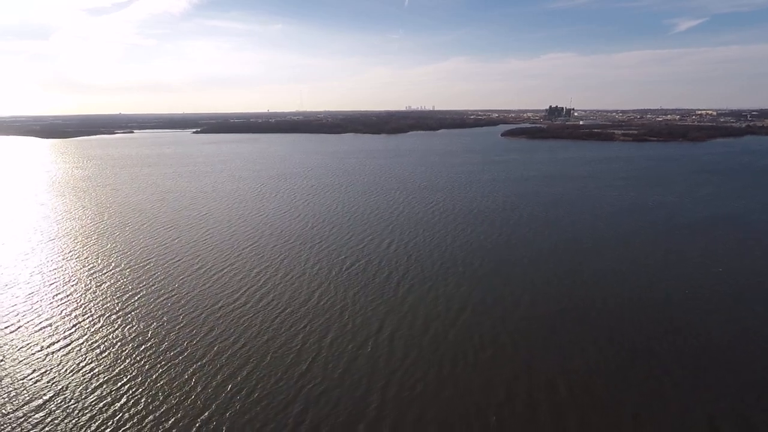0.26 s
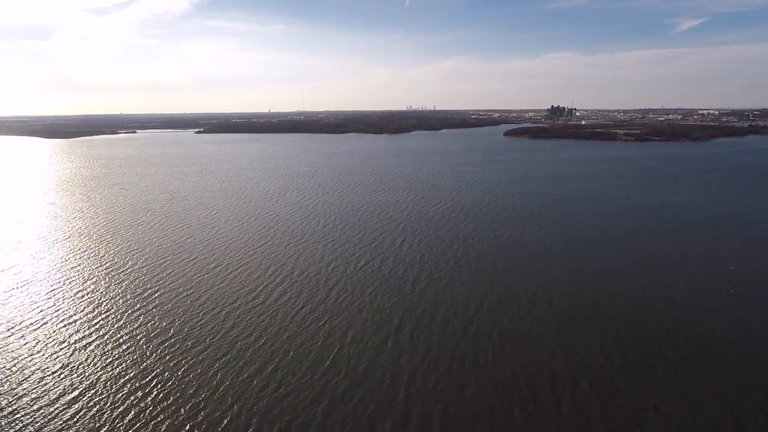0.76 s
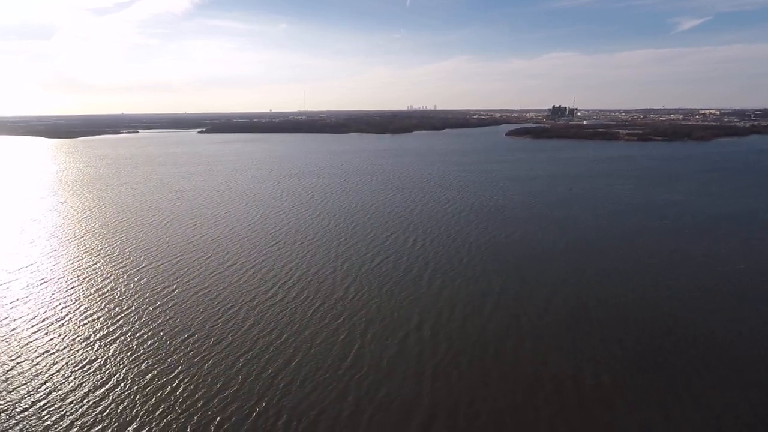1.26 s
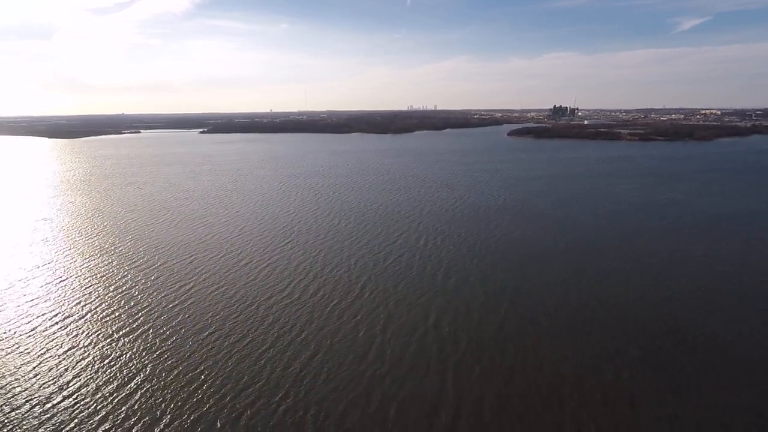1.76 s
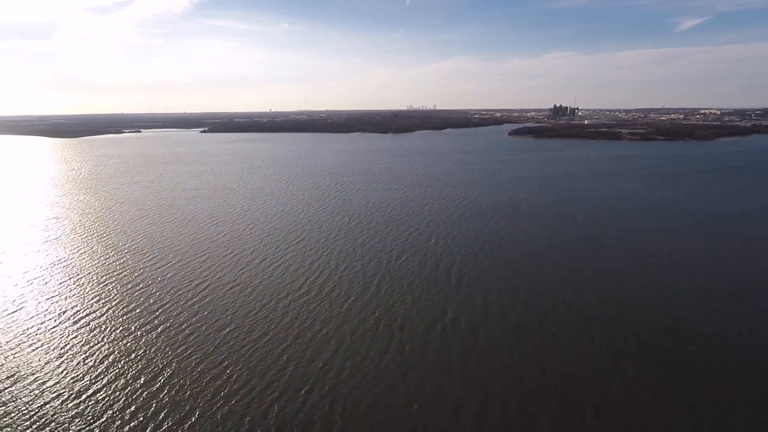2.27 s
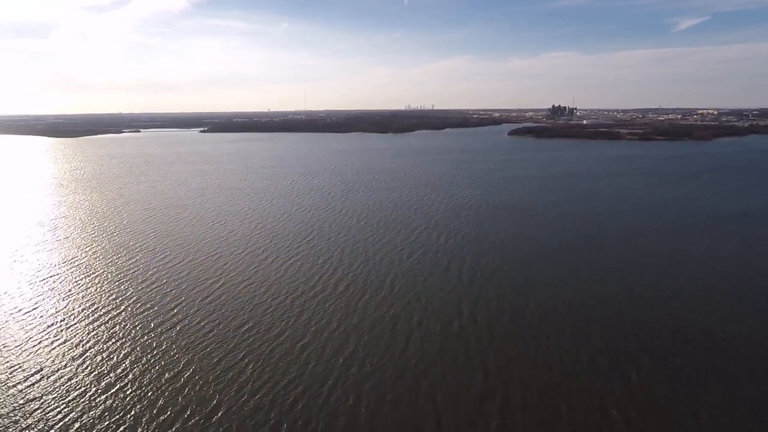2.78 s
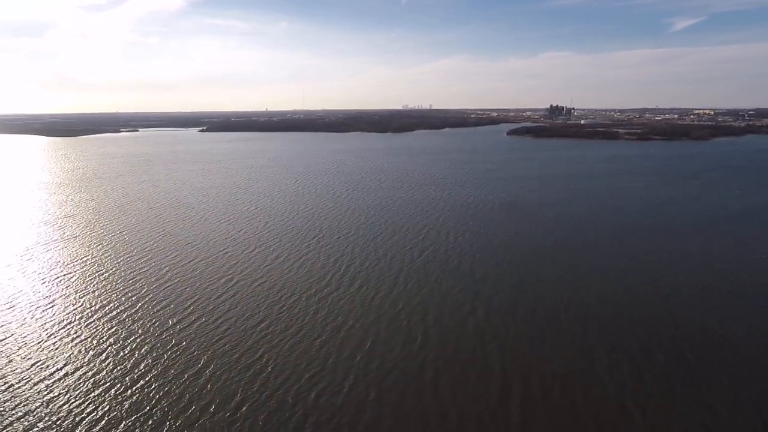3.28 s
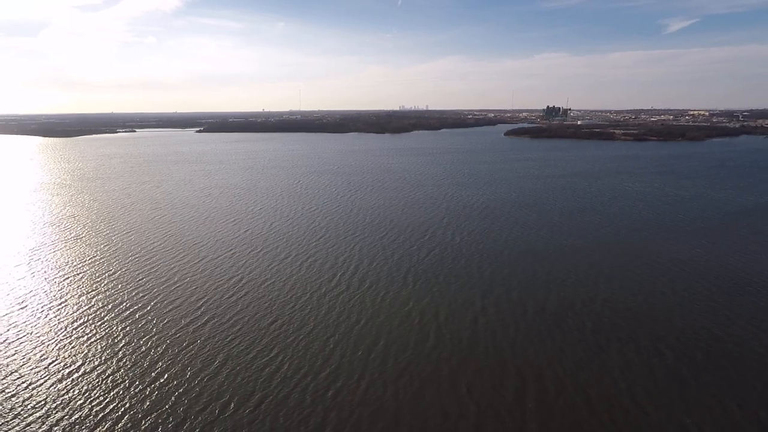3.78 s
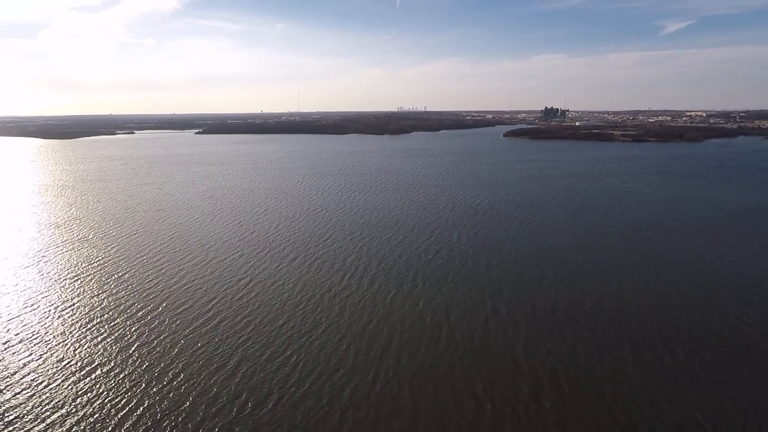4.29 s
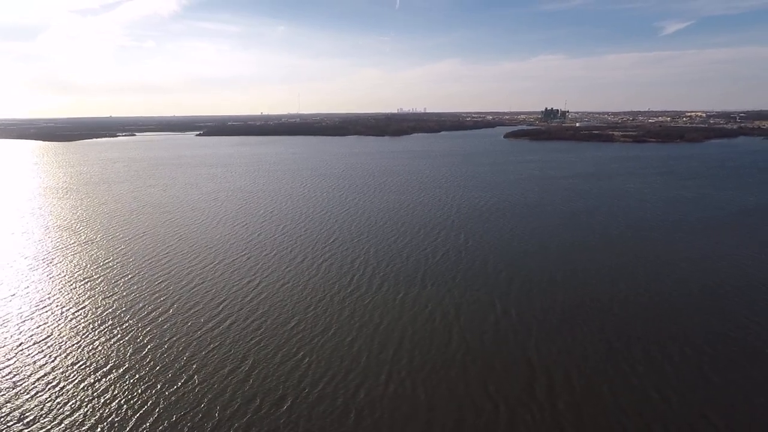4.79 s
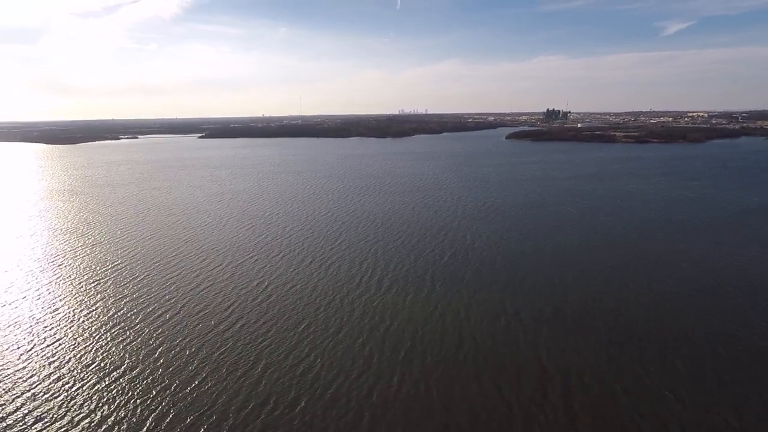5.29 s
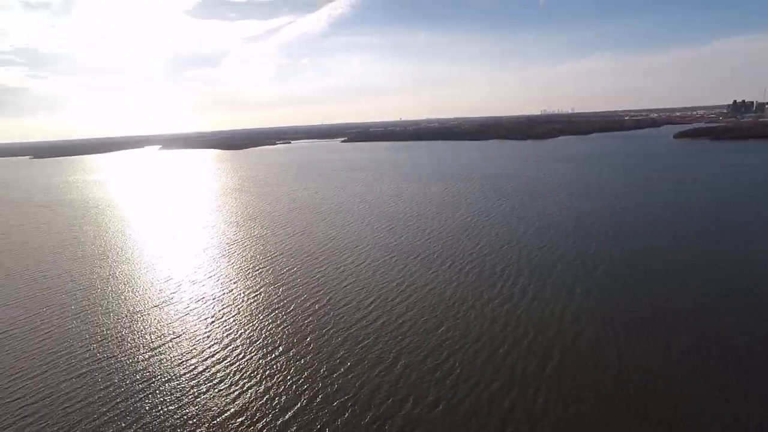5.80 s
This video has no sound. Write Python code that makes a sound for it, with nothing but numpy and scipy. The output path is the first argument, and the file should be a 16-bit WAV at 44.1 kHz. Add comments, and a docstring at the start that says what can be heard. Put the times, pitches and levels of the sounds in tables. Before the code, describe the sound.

Close rotor hum and fluttering prop wash pound the microphone, drop to a cleaner whine, then return with rushing wind and hard slaps of air.

```python
"""Over open water, in the air: a small quadcopter, heard at the camera that hangs under it, close to its rotors.
The nearest propeller's wake slaps the microphone once a blade, as pulsing dips of pressure and puffs of noise.
The other rotors hum as harmonics of their blade rates; sine tones tied to the rotor speeds make the motor whine.
That rotor slows and the buffeting drops away; then the craft gathers speed with a rush of filtered noise,
and gusts and torn eddies rumble, slap and crack at the microphone."""
import sys
import numpy as np
from scipy import signal
from scipy.fft import rfft, irfft
from scipy.io import wavfile
from scipy.ndimage import uniform_filter1d

SR = 44100
rng = np.random.default_rng(int(sys.argv[2]) if len(sys.argv) > 2 else 0)


def unload_audio(sound):
    """Save the sound as a 16-bit wav file, at the path given as the first command line argument."""
    columns = np.transpose(np.atleast_2d(sound))
    # keep every value between -1 and 1, then stretch to whole-number steps
    steps = np.round(np.clip(columns, -1, 1) * 32767)
    wavfile.write(sys.argv[1], SR, steps.astype(np.int16))


N = 266800
TIME = np.arange(N) / SR  # s

# blade rate of the nearest rotor: [t/s, f/Hz]
NEAR_ROTOR = [(0, 182), (.08, 182), (.14, 175), (.4, 187), (.52, 180), (.7, 183), (.8, 179), (1.08, 179),
              (1.16, 173), (1.29, 175), (1.4, 186), (1.65, 189), (1.76, 182), (1.91, 188), (2.04, 178),
              (2.2, 184), (2.43, 181), (2.56, 177), (2.8, 185), (2.9, 181), (3.14, 196), (3.23, 172),
              (3.34, 161), (3.5, 150), (3.62, 159), (3.71, 150), (3.79, 155), (3.86, 152), (4.01, 173),
              (4.07, 169), (4.28, 170.5), (4.37, 177.5), (4.55, 171), (4.72, 177), (4.89, 171), (5.1, 175),
              (5.25, 169), (5.43, 183), (5.52, 180), (5.62, 188), (5.88, 181), (6.05, 183)]
# blade rate of the second rotor, which surges again and again to hold the tilt: [t/s, f/Hz]
SECOND_ROTOR = [(0, 185), (1.2, 182), (1.6, 187), (2.6, 183), (3.32, 189), (3.39, 185), (3.45, 187.5),
                (3.52, 175), (3.58, 170), (3.64, 188), (3.7, 185), (3.76, 169), (3.81, 167.5), (3.87, 187),
                (3.95, 178), (4, 192), (4.12, 189), (4.24, 192), (4.55, 181), (4.66, 187), (4.75, 180),
                (4.83, 186), (4.93, 180.5), (5.17, 185), (5.24, 178.5), (5.33, 187), (5.5, 179.5),
                (5.59, 187), (5.7, 183), (5.95, 161), (6.05, 174)]
# air rushing past the frame, against hovering: [t/s, level/dB]
AIRSPEED = [(0, -0.5), (2.9, -1), (3.3, 1.5), (3.72, 8.5), (4.14, 10), (4.55, 4.5), (5.1, 10.5), (5.27, 9),
            (5.38, 11), (5.6, 7), (5.7, -1), (6.05, 6.5)]
# how strongly the wake blows on the microphone, against hovering: [t/s, level/dB]
WAKE = [(0, -.3), (.8, 1), (1.18, -0.3), (1.45, -1.5), (2.3, 0.8), (2.7, -1.5), (3.16, 1.5), (3.22, -8),
        (3.37, -25.5), (3.94, -18.5), (3.98, -7.5), (4.35, -4.5), (4.62, -2), (4.88, -3), (5.39, -1),
        (5.51, -1), (5.77, 1.3), (5.87, -12), (6.05, -11)]
# gusts on the microphone: [start t/s, end t/s, rumble level/dB]
GUSTS = [(3.955, 4.17, -16), (4.28, 4.5, -13), (5.2, 5.6, -18)]
# spells with the core of the wake on the microphone: [start t/s, end t/s, throb level/dB]
THROBS = [(-.1, 3.22, -19), (4.53, 4.76, -15.5), (5.03, 5.52, -16), (5.6, 5.73, -19)]
# hardest slaps of air, before build-up time and trim: [t/s, level/dB]
SLAPS = [(0.207, -4), (.253, -3), (.861, -9), (3.155, -2), (3.184, -5.5), (3.261, -3.5), (3.99, -3.5),
         (4.004, -9), (4.018, -9), (4.028, -5.5), (4.095, -19), (4.116, 0), (4.146, 2), (4.159, -4),
         (4.189, -9), (4.212, -7), (4.224, -2), (4.236, -6), (4.247, -2), (4.276, -8), (4.307, 1),
         (4.311, -6), (4.319, -2), (4.333, -4), (4.353, -0.5), (4.377, 0), (4.388, 6), (4.421, -2),
         (4.486, -6), (4.5, -2), (4.555, -4), (4.572, -2), (4.609, -3), (4.64, -2), (4.665, -5),
         (4.708, -7), (4.859, -3), (5.357, -2), (5.656, -2), (5.694, -3), (5.981, -10)]
# sharp cracks of air, peak before trim: [t/s, level/dB]
CRACKS = [(.2099, -18), (.303, -13), (0.3443, -15), (.5422, -16), (0.696, -11), (.779, -11), (0.8124, -12),
          (.796, -17), (.833, -15), (.8525, -19), (.941, -16.5), (1.0085, -22), (1.0645, -23),
          (1.1505, -11), (1.1717, -14), (1.1846, -16), (1.3533, -17), (1.4117, -18), (1.9898, -16),
          (2.0884, -13.5), (2.3215, -18), (2.338, -19), (2.5027, -13), (2.802, -14), (2.9629, -16),
          (3.0378, -12), (3.071, -14), (3.1125, -18), (3.118, -16), (3.1244, -10), (3.1405, -8.5),
          (3.147, -18), (3.167, -19), (3.1844, -15), (4.1175, -10), (4.277, -14), (4.3075, -12),
          (4.338, -13), (4.388, -11.5), (4.446, -15), (4.457, -6), (4.462, -7), (4.508, -10),
          (4.5617, -11.5), (4.587, -6), (5.2374, -11), (5.3908, -13), (5.6286, -12), (5.6727, -14)]
# tone of one propeller: [multiple of the blade rate, relative level/dB]
BLADE_ORDERS = [(1, 3.5), (2, -6), (3, -13), (4, -14), (5, -10.5), (6, -19), (7, -20.5), (9, -24),
                (11, -28)]

# spectra of the steady draft, the wind rumble and the rush of air: [f/Hz, relative level/dB]
DRAFT_SPECTRUM = [(15, -33), (30, 2), (55, 2.5), (120, -1.5), (220, -9.5), (800, -53.5)]
RUMBLE_SPECTRUM = [(15, -17), (30, -23.5), (50, -5), (85, 1), (140, 0), (200, -7), (300, -26), (600, -34),
                   (2000, -74)]
RUSH_SPECTRUM = [(400, 18), (1500, 21.5), (2500, 16), (3700, 12), (5000, 10.5), (7000, 2.5), (9700, 1),
                 (11200, -4), (12700, -2), (15500, -7)]
# spectrum of the blade swish: [f/Hz, relative level/dB]
SWISH_SPECTRUM = [(150, 2.5), (400, -1.5), (1100, 2), (2000, -7.5), (3000, -16), (3900, -13.5), (5200, -26),
                  (7000, -28.5), (9500, -30), (11500, -52), (16000, -56)]
# spectra of a slap and of a crack: [f/Hz, relative level/dB]
SLAP_SPECTRUM = [(30, 8), (75, 15), (130, 4.5), (260, 10), (650, 7.5), (1300, -2.5), (2200, -13),
                 (3500, -25), (8000, -35), (16000, -73)]
CRACK_SPECTRUM = [(500, 2.5), (2000, 14), (4000, 7.5), (6300, 0), (8000, -8), (10500, -15), (15500, -26)]
# spectra of the wake's thud, buffet, crackle, spikes and chopped airstream: [f/Hz, relative level/dB]
THUD_SPECTRUM = [(60, -31), (150, -1), (250, -0.5), (400, -6.5), (700, -13), (1500, -39), (5000, -79)]
BUFFET_SPECTRUM = [(60, -29), (250, -3), (500, -3.5), (750, -6.5), (1200, -9.5), (2000, -16), (3200, -31.5),
                   (5000, -55), (8000, -80), (16000, -64)]
CRACKLE_SPECTRUM = [(500, -12), (1500, 5.5), (3000, 4.5), (5000, -5), (7000, -21), (9500, -26),
                    (12000, -40), (16000, -32)]
SPIKE_SPECTRUM = [(300, -18), (1200, 0.5), (2500, 4.5), (4500, -6.5), (7000, -19.5), (10000, -30.5),
                  (16000, -31)]
CHOP_SPECTRUM = [(500, -1), (1500, 2.5), (3000, 3), (5000, -5), (7000, -19), (10000, -27), (16000, -31)]

# dB that each layer gains for one dB of wake
THUD_PER_WAKE, BUFFET_PER_WAKE, CRACKLE_PER_WAKE, RUMBLE_PER_WAKE = 0.79, 0.84, 1.7, 0.31
SPIKES_PER_WAKE, CHOP_PER_WAKE = 1.8, 1.07
CRACK_TILT_PER_WAKE = 0.73  # dB per octave for one dB of wake
# dB that each layer gains for one dB of airspeed
BUFFET_PER_AIR, CRACKLE_PER_AIR, RUMBLE_PER_AIR, WHINE_PER_AIR = -0.47, 0.27, -0.14, 0.79

WHINE_PER_BLADE = 21  # cycles of motor whine in one blade pass
OVERTONE = 4 / 3  # upper partial of a motor, as a multiple of its whine
# resonance of the frame that carries the whine
FRAME_HZ, FRAME_HALF_WIDTH_HZ = 3770, 190
# a motor whines louder while it is driven faster and fades while it coasts
DRIVE_DB, FULL_DRIVE_HZ_PER_S = 4, 120

# once the craft tilts, the wake bunches less tightly behind each blade and its puffs grow uneven
TILT_S, TILT_LENGTH_S = 3.2, 0.12
HOVER_BUNCHING, TILTED_BUNCHING = 1.22, 0.62
HOVER_SCATTER_DB, TILTED_SCATTER_DB = 1, 5
# as the tilt begins, the core swings toward the microphone and its throb runs ahead of the blades
SWING_S, SWING_LENGTH_S, SWING_TURNS = 3.13, 0.04, 1
DIP_NARROWNESS = 0.61  # second harmonic of the dip against the first, per unit of bunching
CRACKLE_FOCUS = 0.9  # how closely the crackle keeps to the peak of each puff
SPIKE_RATE_PER_S = 260  # weighted by the squared puff envelope
THROB_EDGE_S, GUST_EDGE_S = 0.037, 0.0091
EDGE_HZ = 15500  # upper band limit


def gain_of(db):
    """Amplitude factor for a level in dB."""
    return 10 ** (np.asarray(db) / 20)


def evened(x):
    """The signal scaled to rms 1."""
    return x / np.sqrt(np.mean(x ** 2) + 1e-20)


def follow(rows):
    """Value of a two-column curve table, sample by sample."""
    s, values = np.transpose(rows)
    return np.interp(TIME, s, values)


def spells(rows, edge_s):
    """Gain that swells at the start of each row, holds its level and dies at its end."""
    total = np.zeros(N)
    for start, end, db in rows:
        swell = np.tanh((TIME - start) / edge_s)
        fade = np.tanh((TIME - end) / edge_s)
        total += gain_of(db) * (swell - fade) / 2
    return total


def wander(hz):
    """Chance drift of rms 1, mostly slower than hz."""
    low_pass = 1 / (1 + (np.fft.rfftfreq(N, 1 / SR) / hz) ** 4)
    return evened(irfft(rfft(rng.standard_normal(N)) * low_pass, N))


def colour(x, points, size=8192):
    """Causal, minimum-phase filter with the given spectrum."""
    hz, db = np.transpose(points)
    bins_hz = abs(np.fft.fftfreq(size, 1 / SR)) + 1
    log_gain = np.log(gain_of(np.interp(np.log(bins_hz), np.log(hz), db)))
    response = np.exp(np.conj(signal.hilbert(log_gain)))
    taps = np.fft.ifft(response).real[:size // 2]
    return signal.oaconvolve(x, taps)[:len(x)]


def hiss(points, envelope=1):
    """Noise shaped by an envelope, then given a colour, rms 1."""
    return evened(colour(rng.standard_normal(N) * envelope, points))


def wind(air_db, wake_db):
    """A steady low draft, a rumble stirred by the wake and by gusts, and a rush that grows with airspeed."""
    draft = gain_of(-27.5) * hiss(DRAFT_SPECTRUM)
    stirred = gain_of(-16.5 + RUMBLE_PER_WAKE * wake_db + RUMBLE_PER_AIR * air_db)
    gusts = spells(GUSTS, GUST_EDGE_S)
    rumble = np.hypot(stirred, gusts) * hiss(RUMBLE_SPECTRUM)
    rush = gain_of(-42 + air_db) * hiss(RUSH_SPECTRUM, gain_of(1.6 * wander(120)))
    return draft + rumble + rush


def spin(rate_hz, flutter):
    """Count of blade passes; the flight controller keeps trimming the speed."""
    return np.cumsum(rate_hz * (1 + flutter * wander(11))) / SR


def propeller(turns, unsteady):
    """One pressure pulse a blade; each harmonic flutters in the uneven inflow."""
    tone = np.zeros(N)
    for order, db in BLADE_ORDERS:
        flutter = 1 + unsteady * wander(21)
        tone -= gain_of(db) * flutter * np.cos(2 * np.pi * order * turns)
    return tone


def motor(turns, ripple, overtone_db):
    """Magnets passing stator teeth whine above the blade rate, louder under drive and at the frame resonance."""
    angle = 2 * np.pi * WHINE_PER_BLADE * turns + ripple * wander(55)  # torque ripple blurs the line
    rate_hz = np.gradient(turns) * SR
    frame = 1 / np.hypot(1, (WHINE_PER_BLADE * rate_hz - FRAME_HZ) / FRAME_HALF_WIDTH_HZ)
    speeding = uniform_filter1d(np.gradient(rate_hz) * SR, size=1500)
    drive = gain_of(DRIVE_DB * np.clip(speeding / FULL_DRIVE_HZ_PER_S, -2, 0.25))
    partials = np.sin(angle) + gain_of(overtone_db) * np.sin(OVERTONE * angle)
    return frame * drive * (1 + 0.35 * wander(18)) * partials


def rotors(near_turns, near_hz, air_db):
    """Four rotors at slightly different speeds hum, three motors whine, and blades swish as pulsing noise."""
    second_hz = follow(SECOND_ROTOR)
    second = spin(second_hz, flutter=0.00098)
    # the far pair keeps near the mean speed
    mean_hz = (near_hz + second_hz) / 2
    third = spin(mean_hz, flutter=0.018)
    fourth = spin(mean_hz, flutter=0.018)

    tones = gain_of(-27) * propeller(near_turns, unsteady=0.15)
    tones += gain_of(-40) * propeller(second, unsteady=0.69)
    tones += gain_of(-43) * propeller(third, unsteady=0.75)
    tones += gain_of(-43) * propeller(fourth, unsteady=0.74)

    whine = gain_of(-48.5) * motor(second, ripple=0.55, overtone_db=-9)
    whine += gain_of(-50.5) * motor(near_turns, ripple=0.65, overtone_db=-8)
    whine += gain_of(-59) * motor(third, ripple=0.88, overtone_db=-14)

    near_swing = 0.22 * np.cos(2 * np.pi * near_turns)
    second_swing = 0.17 * np.cos(2 * np.pi * second)
    swish = gain_of(-32) * hiss(SWISH_SPECTRUM, 1 + near_swing + second_swing)
    return tones + gain_of(WHINE_PER_AIR * air_db) * whine + swish


def cracks(wake_db, rise_s, trim_db, size=2048):
    """Small eddies burst right on the microphone port, brighter in a stronger wake."""
    out = np.zeros(N + size)
    age = np.arange(size) / SR / rise_s
    corner_hz = CRACK_SPECTRUM[0][0]
    for s, db in CRACKS:
        at = round(s * SR)
        tilt = CRACK_TILT_PER_WAKE * wake_db[at]
        tone = [(hz, level + tilt * np.log2(hz / corner_hz)) for hz, level in CRACK_SPECTRUM]
        burst = colour(rng.standard_normal(size) * age * np.exp(-age), tone)
        out[at:][:size] += gain_of(db + trim_db) * burst / abs(burst).max()
    return out[:N]


def slaps(trim_db, build_s, tear_db, tear_s, rebound_hz):
    """A big eddy hits the microphone: a jolt of suction, a rebound of pressure, and a rasp as the eddy tears."""
    hits = np.zeros(N)
    for s, db in SLAPS:
        hits[round((s + build_s) * SR)] = gain_of(db + trim_db)
    decay = signal.lfilter([1], [1, -np.exp(-1 / (tear_s * SR))], hits)
    tear = gain_of(tear_db) * rng.standard_normal(N) * decay
    unit_peak = abs(colour(signal.unit_impulse(SR), SLAP_SPECTRUM)).max()
    jolts = colour(hits + tear, SLAP_SPECTRUM) / unit_peak
    # all-pass: the low part arrives late, with the opposite sign
    lag = np.exp(-2 * np.pi * rebound_hz / SR)
    return signal.lfilter([-lag, 1], [1, -lag], jolts)


def per_blade(turns):
    """One random value for each blade pass, held until the next."""
    passes = (turns + 0.5).astype(int)
    return np.clip(rng.standard_normal(N), -2, 2)[passes]


def pressure_dip(core_turns, bunching):
    """Suction once a blade; a tighter wake makes a narrower dip, richer in harmonics."""
    narrowness = np.clip(DIP_NARROWNESS * bunching, 0, 1)
    return -sum(narrowness ** ((k - 1) ** 2) * np.cos(2 * np.pi * k * core_turns) for k in range(1, 5))


def wake(turns, air_db, wake_db):
    """Each blade throws a dip of pressure and a puff of eddies at the microphone, crackling as it lands."""
    tilt = np.clip((TIME - TILT_S) / TILT_LENGTH_S, 0, 1)
    bunching = HOVER_BUNCHING + tilt * (TILTED_BUNCHING - HOVER_BUNCHING)
    scatter_db = HOVER_SCATTER_DB + tilt * (TILTED_SCATTER_DB - HOVER_SCATTER_DB)
    strength = per_blade(turns)
    arrival = turns + 0.015 * wander(25)  # the air carries each puff a little early or late

    core = arrival + SWING_TURNS * (1 + np.tanh((TIME - SWING_S) / SWING_LENGTH_S)) / 2
    unevenness = 1 + 0.31 * uniform_filter1d(strength, size=80)
    throb = spells(THROBS, THROB_EDGE_S) * pressure_dip(core, bunching) * unevenness

    puffs = np.exp(bunching * np.cos(2 * np.pi * (arrival + 0.036))) * gain_of(scatter_db * strength)
    puffs /= np.sqrt(uniform_filter1d(puffs ** 2, size=8000))
    thud_gain = gain_of(-17.5 + 2.43 * tilt + THUD_PER_WAKE * wake_db)
    thud = thud_gain * hiss(THUD_SPECTRUM, puffs ** 0.16)
    buffet_gain = gain_of(-19.5 + BUFFET_PER_WAKE * wake_db + BUFFET_PER_AIR * air_db)
    buffet = buffet_gain * hiss(BUFFET_SPECTRUM, puffs * gain_of(2.05 * wander(640)))

    # the smallest eddies snap briefly inside each puff
    snaps = gain_of(4.4 * per_blade(turns) + 14 * np.tanh(wander(740)))
    crackle_gain = gain_of(-41 + CRACKLE_PER_WAKE * wake_db + CRACKLE_PER_AIR * air_db)
    crackle = crackle_gain * hiss(CRACKLE_SPECTRUM, puffs ** CRACKLE_FOCUS * snaps)

    # sharp spikes of random size crowd into the strong puffs, often more than one to a puff
    spike_starts = rng.random(N) < SPIKE_RATE_PER_S / SR * puffs ** 2
    sizes = gain_of(4 * np.clip(rng.standard_normal(N), -2, 2)) * spike_starts
    spikes = gain_of(-34.5 + SPIKES_PER_WAKE * wake_db) * evened(colour(-sizes, SPIKE_SPECTRUM))

    # at speed the blades chop the airstream into even, dense bursts
    bursts = np.exp(0.75 * np.cos(2 * np.pi * arrival)) * gain_of(1.9 * strength)
    chop = gain_of(-39.5 + air_db + CHOP_PER_WAKE * wake_db) * hiss(CHOP_SPECTRUM, bursts)
    return throb + thud + buffet + crackle + spikes + chop


def scene():
    """Rotor speed, airspeed and the strength of the wake drive the layers, summed to one channel."""
    near_hz, air_db, wake_db = follow(NEAR_ROTOR), follow(AIRSPEED), follow(WAKE)
    turns = spin(near_hz, flutter=0.00159)
    mix = wind(air_db, wake_db)
    mix += rotors(turns, near_hz, air_db)
    mix += cracks(wake_db, rise_s=0.00034, trim_db=0.5)
    mix += slaps(trim_db=1.5, build_s=0.001193, tear_db=-21, tear_s=0.001, rebound_hz=900)
    mix += wake(turns, air_db, wake_db)
    return mix[None]


def record(dry):
    """The microphone sheds the deepest rumble and rounds off the biggest peaks; then the band limit."""
    lean = signal.sosfilt(signal.butter(2, 20, "highpass", fs=SR, output="sos"), dry)
    ceiling = 0.95  # of full scale
    rounded = lean / (1 + (lean / ceiling) ** 6) ** (1 / 6)
    band_limit = signal.firwin(511, EDGE_HZ, window=("kaiser", 9), fs=SR)
    return signal.oaconvolve(rounded, band_limit[None], "same")


dry = scene()
out = record(dry)
unload_audio(out)
```